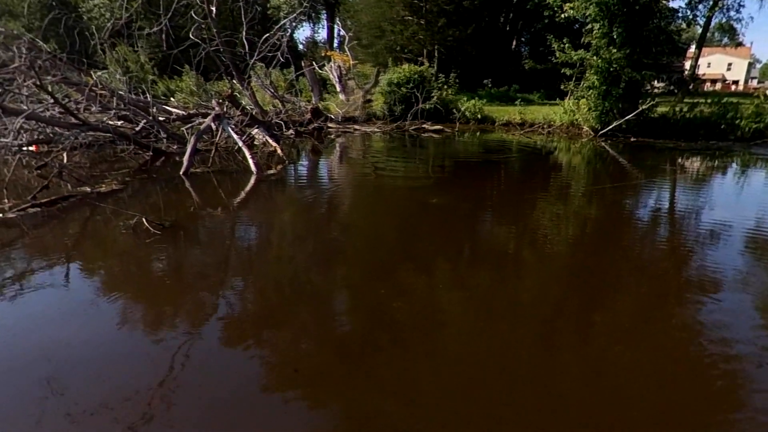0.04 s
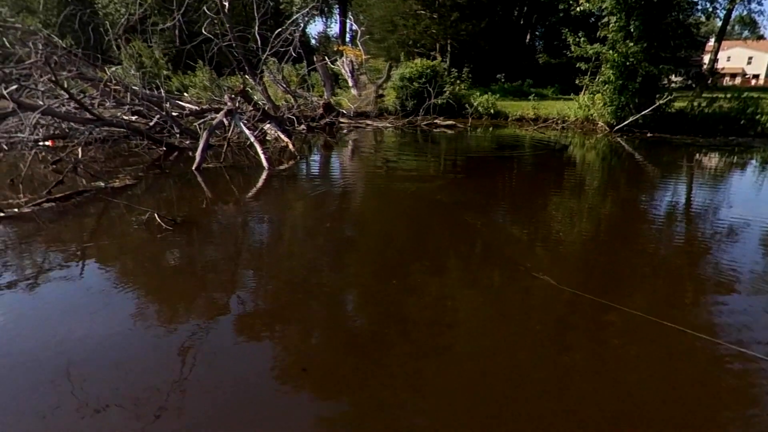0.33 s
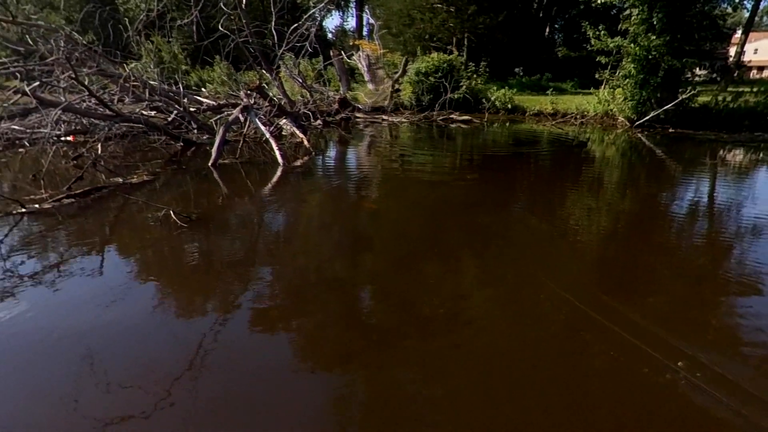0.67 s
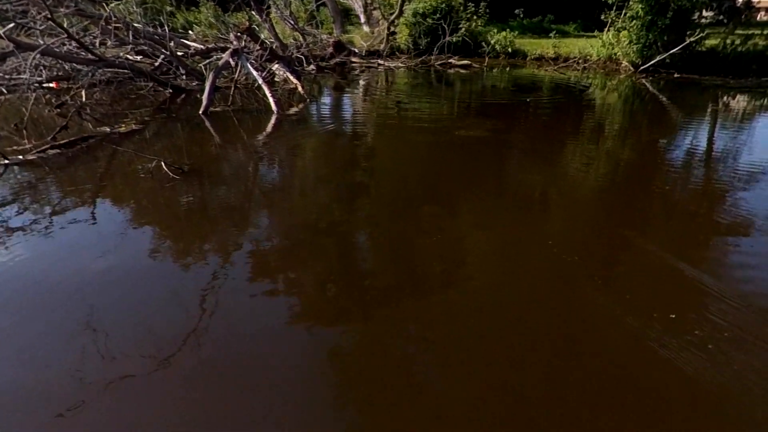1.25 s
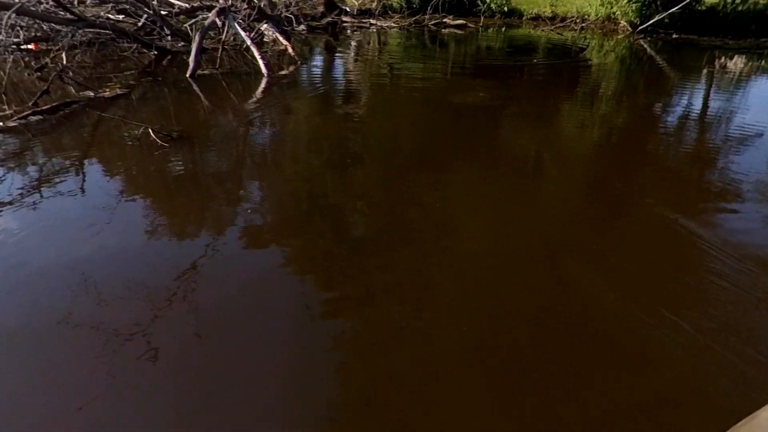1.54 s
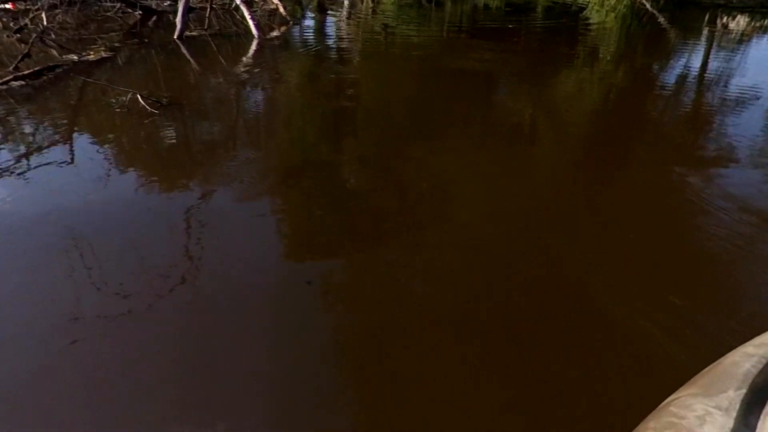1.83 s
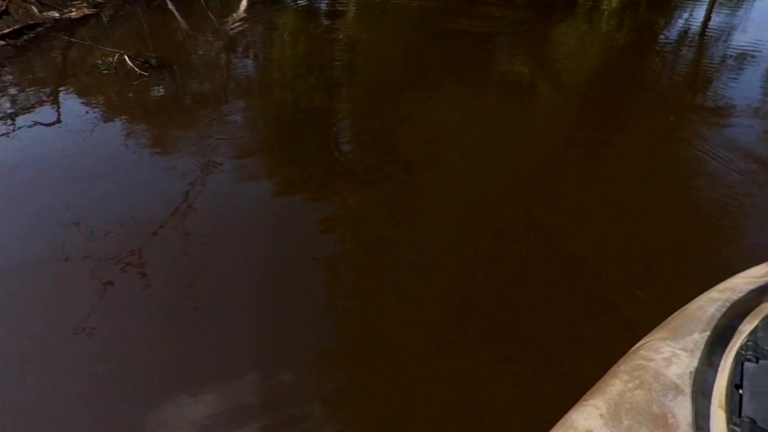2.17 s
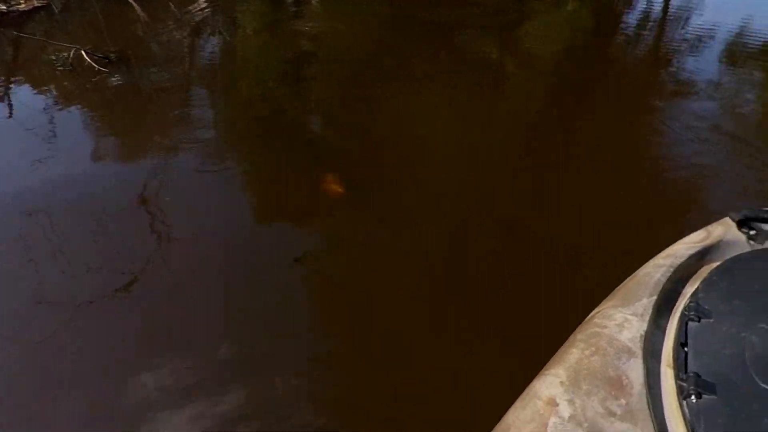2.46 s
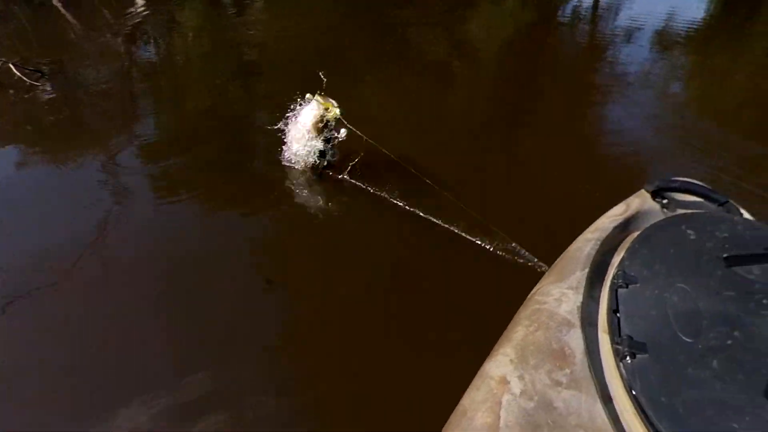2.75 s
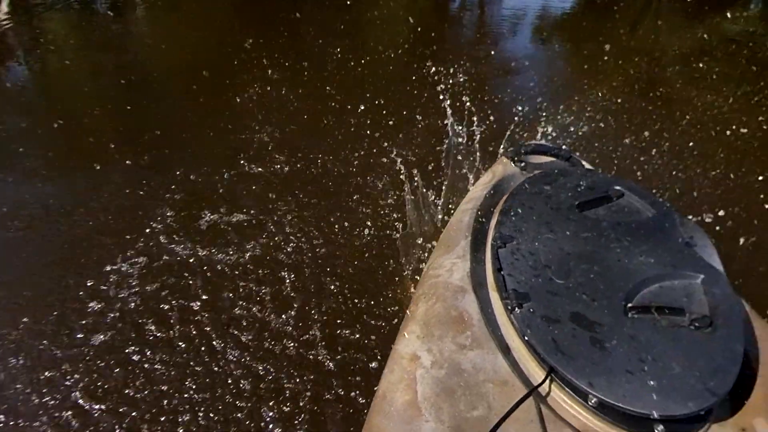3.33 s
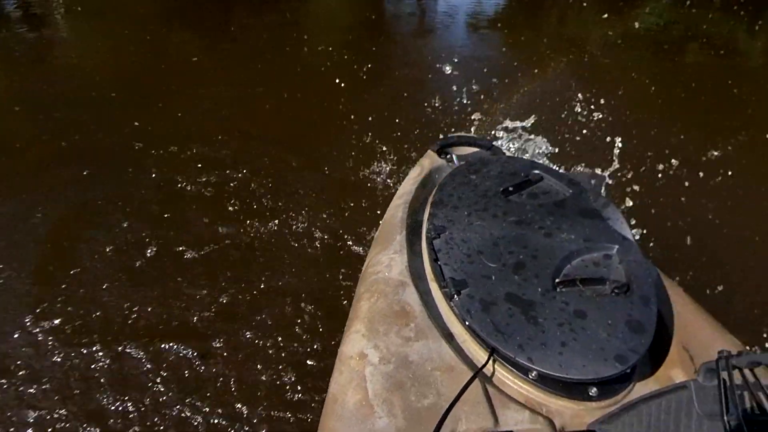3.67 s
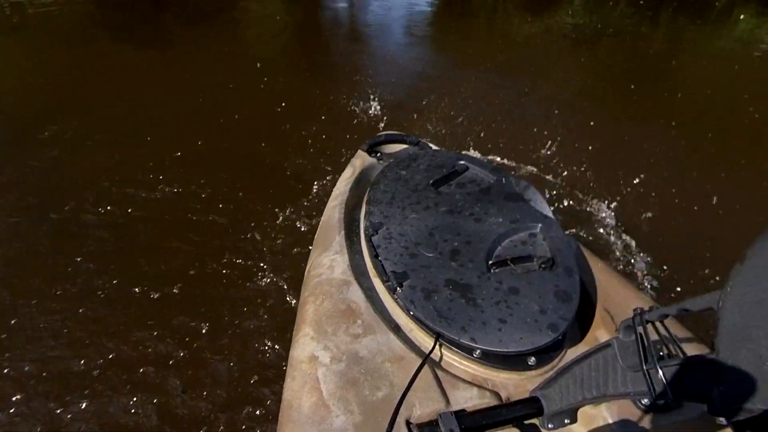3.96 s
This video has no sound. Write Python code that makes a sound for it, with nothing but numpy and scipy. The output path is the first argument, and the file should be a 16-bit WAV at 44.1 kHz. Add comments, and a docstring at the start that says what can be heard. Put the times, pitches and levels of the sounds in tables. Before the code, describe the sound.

A fish thrashes beside a kayak, with one sharp crack of fishing tackle, over steady hiss.

```python
"""A steady hiss on the right microphone and soft laps on a quiet lake; then a hooked fish thrashes
beside a kayak. Taut line rasps and whistles through the rod guides, the tackle ticks, then lets go
with a sharp double crack that rings the plastic hull and sinks into a thud. The splashes are drop
impacts and ringing bubbles; fine spray patters back on the water close by, to the right."""
import sys
import numpy as np
from scipy import signal
from scipy.fft import rfft, irfft
from scipy.io import wavfile
from scipy.ndimage import uniform_filter1d

SR = 44100
rng = np.random.default_rng(int(sys.argv[2]) if len(sys.argv) > 2 else 0)


def wav_out(sig):
    """Save sig, one row per channel (or a flat mono array), as 16-bit PCM at SR to the path in sys.argv[1]."""
    wavfile.write(sys.argv[1], SR, np.round(np.clip(np.atleast_2d(sig).T, -1, 1) * 32767).astype(np.int16))


N = 176400
TIME = np.arange(N) / SR
TOP_HZ, LINE_PAN_DB = 15850, -9

# blows of the crack (t/s, level/dB, low-pass f/Hz, left-right/dB)
BLOWS = [(3.1303, 12.5, 3300, 1), (3.1335, 9, 1800, 2), (3.1387, 12, 1050, 1), (3.1422, 5, 2000, 1)]


def undb(db):
    return 10 ** (np.asarray(db) / 20)


def unit(x):
    return x / np.sqrt(np.mean(x ** 2))


def noise():
    return rng.standard_normal((2, N))


def pan(db):
    """Microphone gains for a left-minus-right level difference."""
    return undb(np.array([[db], [-db]]) / 2)


def colour(x, points):
    """Causal filter through (f/Hz, level/dB) points that keeps the power of white noise."""
    hz, db = np.array(points, float).T
    bin_hz = np.arange(N // 2 + 1) * SR / N
    gain = unit(undb(np.interp(np.log(bin_hz + 1), np.log(hz), db)))
    cepstrum = irfft(np.log(gain), N)
    cepstrum[1:N // 2] *= 2
    cepstrum[N // 2 + 1:] = 0
    return irfft(rfft(x) * np.exp(rfft(cepstrum)), N)


def band(x, hz, width):
    """One resonance, gain 1 at its centre."""
    return signal.lfilter(*signal.iirpeak(hz, hz / width, fs=SR), x)


def butter(x, order, hz, kind):
    return signal.sosfilt(signal.butter(order, hz, kind, fs=SR, output="sos"), x)


def fade(start, t60, rise=1 / SR):
    """Envelope with a straight rise and an exponential fall; times in seconds."""
    age = np.maximum(TIME - start, 0)
    return np.minimum(age / rise, 1) * np.exp(-np.log(1000) * np.maximum(age - rise, 0) / t60) + 1e-18


def walk(per_s):
    """Smooth random wander with a spread of 1."""
    return unit(uniform_filter1d(rng.standard_normal(N), int(SR / per_s)))


def crack():
    """A few blows within 12 ms, each a contact pulse and a short rattle, ring the rod and hull."""
    # resonances of rod and hull (f/Hz, width/Hz, level/dB)
    modes = [(380, 44, -3.5), (626, 44, -10), (808, 61, 1), (1030, 47, -4), (1235, 74, -4),
             (1470, 220, 2.5), (1710, 120, 7), (2590, 220, 4), (2850, 150, 3.5), (3080, 100, 0.5),
             (4360, 280, 2)]
    rattle_db, contact_db, left_lag_s = -7.5, -2.5, 0.00027
    force = 0
    for start, db, bright_hz, side_db in BLOWS:
        push = rng.standard_normal(N) * fade(start, t60=0.022)
        push *= undb(rattle_db) / np.sqrt(np.sum(push ** 2))
        push[int(start * SR)] += undb(contact_db)
        force = force + undb(db) * pan(side_db) * butter(push, 4, bright_hz, "low")
    ring = sum(undb(db) * band(force, hz, width) for hz, width, db in modes)
    snap = undb(-32) * band(force, hz=2000, width=3600)
    left, right = butter(ring + snap, 1, 288, "high")  # the hull radiates little bass
    return np.array([np.roll(left, int(left_lag_s * SR)), right])


def thud():
    """The crack sinks into a thud: bending waves arrive high notes first, so the pitch falls."""
    start, start_hz, sag_s = 3.131, 1250, 0.0165
    hz = start_hz / (1 + np.maximum(TIME - start, 0) / sag_s)
    wave = np.sin(2 * np.pi * start_hz * sag_s * np.log(start_hz / hz))
    return undb(-30.5) * fade(start, t60=0.125, rise=0.007) * wave * pan(1)


def crack_tail():
    """The crack dies away over the hull and water as a diffuse ring."""
    # octave bands of the decay (f/Hz, level/dB, t60/s)
    octaves = [(237, -52.5, 0.55), (464, -49.5, 0.64), (890, -35.5, 0.23), (1740, -38, 0.13),
               (3260, -39.5, 0.23), (6440, -62, 0.37), (12000, -50, 0.4)]
    ring = 0
    for hz, db, t60 in octaves:
        edges_hz = [hz / np.sqrt(2), min(hz * np.sqrt(2), TOP_HZ)]
        wash = unit(butter(noise(), 3, edges_hz, "band"))
        ring = ring + undb(db) * fade(BLOWS[0][0], t60, rise=0.0052) * wash
    return ring


def line():
    """To the right, line running through the guides rasps and sets off an unsteady, very high whistle."""
    # run of the line (t/s, rasp level/dB, whistle f/Hz, whistle level/dB)
    run = [(2.845, -52, 9780, -75), (2.870, -38.5, 9950, -57), (2.883, -40, 9960, -35),
           (2.891, -41, 9980, -44), (2.905, -44.5, 10100, -42), (2.925, -45, 10200, -51),
           (2.955, -50, 9950, -50), (2.98, -47, 10250, -46), (3.005, -51, 10100, -66),
           (3.11, -49, 10200, -75), (3.18, -58, 10050, -80)]
    # spectrum of the rubbing (f/Hz, level/dB)
    rasp_spectrum = [(300, -30), (1500, -11), (4000, 3.5), (6500, 10.5), (11000, 7), (13500, 12),
                     (15500, 9.5)]
    # whistle partials (ratio to the main one, level/dB)
    partials = [(.702, -10), (1, 0), (1.318, -7)]
    times, *columns = np.array(run).T
    rasp_db, pitch_hz, whistle_db = (np.interp(TIME, times, column) for column in columns)
    running = (TIME > times[0]) & (TIME < times[-1])
    rasp = colour(noise(), rasp_spectrum) * undb(rasp_db + 2 * walk(290))
    jitter, flutter_db = 0.0135, 5
    tone = 0
    for ratio, db in partials:
        hz = ratio * pitch_hz * (1 + jitter * walk(1300))
        tone = tone + undb(db) * np.sin(2 * np.pi * np.cumsum(hz) / SR)
    tone = unit(tone * undb(flutter_db * walk(250)))
    rough_hiss = undb(-18) * unit(band(noise(), hz=10200, width=1100))
    whistle = (tone + rough_hiss) * undb(whistle_db)
    return (rasp + whistle) * running * pan(LINE_PAN_DB)


def sizzle():
    """A thin, very high sizzle as the line goes slack, just before the crack."""
    # swell of the sizzle (t/s, level/dB)
    contour = [(3.03, -65), (3.058, -48), (3.066, -33), (3.085, -51), (3.135, -55)]
    times, db = np.array(contour).T
    swell = np.interp(TIME, times, undb(db), left=0, right=0)
    return swell * unit(band(noise(), hz=14900, width=720)) * pan(LINE_PAN_DB)


def tackle():
    """Small hard parts click, mostly to the right, some with a thin metallic ring."""
    # tackle ticks (t/s, level/dB, t60/s, left-right/dB, relative ring level/dB)
    ticks = [(2.921, -35, 0.015, -14, -10), (2.929, -38, 0.025, -10, 0), (3.057, -36, 0.028, -1, -10),
             (3.0618, -25, 0.014, -12, 7), (3.1286, -29, 0.012, -12, -20), (3.1303, -22, 0.009, -4, -20),
             (3.1384, -22, 0.005, -10, -20), (3.1417, -15, 0.0055, -10, 0), (3.1432, -25, 0.018, -2, -20),
             (3.484, -39, 0.012, -2, -20)]
    # spectrum of a tick (f/Hz, level/dB)
    spectrum = [(300, -20), (2000, -9), (3500, -14.5), (5500, -4.5), (8500, -9.5), (11000, -9), (13500, -3),
                (15500, -6.5)]
    clicks = ringing = 0
    for start, db, t60, side_db, ring_db in ticks:
        click = noise() * undb(db) * fade(start, t60) * pan(side_db)
        clicks = clicks + click
        ringing = ringing + undb(ring_db) * click
    return colour(clicks, spectrum) + band(ringing, hz=14600, width=200)


def bubbles():
    """Small bubbles ring in the water, each rising in pitch as it fades."""
    per_s, low_hz, high_hz, decay_cycles, glide = 300, 650, 4510, 6, 0.04
    fizz = np.zeros((2, N))
    for when, pitch, size, side in rng.random((int(per_s * N / SR), 4)):
        hz = low_hz * (high_hz / low_hz) ** pitch
        onset = int(when * N)
        age = np.arange(min(N - onset, SR // 10)) / SR * hz / decay_cycles  # in decay times
        wave = np.sin(2 * np.pi * decay_cycles * age * (1 + glide * age / 2))
        fizz[:, onset:onset + len(age)] += pan(8 * (side - .5)) * size ** 2 * np.exp(-age) * wave
    return unit(fizz)


def splashes():
    """The fish thrashes beside the kayak: each splash is a shower of drop impacts and bubbles."""
    # splashes (t/s, level/dB, rise/s, t60/s, high-pass f/Hz)
    bursts = [(2.755, -55, 0.044, 0.54, 400), (2.849, -42.5, 0.016, 0.17, 1100),
              (2.92, -53, 0.036, 0.45, 600), (3.056, -47, 0.0072, 0.3, 1100), (3.19, -42, 0.022, 0.25, 200),
              (3.26, -53, 0.035, 1.1, 450), (3.37, -51, 0.013, 0.11, 800), (3.4, -52, 0.017, 0.2, 760),
              (3.48, -55, .008, 0.53, 600), (3.54, -66, 0.025, 3, 400), (3.83, -58, .035, 0.42, 304)]
    # spectrum of the drop impacts (f/Hz, level/dB)
    spectrum = [(100, -46), (200, -19), (330, -3), (600, 1), (1200, 0.5), (2500, -6), (5000, -8.5),
                (9000, -11.5), (15000, -13)]
    drops_per_s = 6000
    drops = (rng.random((2, N)) < drops_per_s / SR) * np.sign(noise())
    shower = (unit(colour(drops, spectrum)) + undb(-7) * bubbles()) * pan(-2.5)
    return sum(undb(db) * fade(start, t60, rise) * butter(shower, 2, low_hz, "high")
               for start, db, rise, t60, low_hz in bursts)


def plips():
    """Single large drops land on the lake with a short, hollow plip."""
    # large drops (t/s, level/dB, f/Hz)
    drops = [(2.859, -51, 2120), (3.063, -54, 2000), (3.378, -45, 2200), (3.739, -56, 2100)]
    sound = 0
    for start, db, hz in drops:
        hollow = unit(band(band(noise(), hz, width=2900), hz, width=2900))
        sound = sound + undb(db) * fade(start, t60=0.044, rise=0.0015) * hollow
    return sound


def spray():
    """Fine spray lands close by on the right in short, bright patters."""
    # falls of spray (t/s, level/dB, t60/s)
    falls = [(3.165, -50, 0.29), (3.225, -48, 0.05), (3.405, -46, 0.073), (3.48, -48.5, 0.076),
             (3.56, -55, 0.19)]
    flow = sum(undb(db) * fade(start, t60, rise=0.0073) for start, db, t60 in falls)
    patter = band(noise(), hz=6960, width=10000) * undb(3.6 * walk(600))
    return flow * unit(patter) * pan(-14)


def laps():
    """The lake laps softly at the hull."""
    # laps (t/s, level/dB)
    wavelets = [(.51, -71), (.715, -60), (.968, -63), (1.205, -65)]
    swell = sum(undb(db) * fade(start, t60=0.11, rise=0.0063) for start, db in wavelets)
    return swell * unit(band(noise(), hz=600, width=810))


def microphone_hiss():
    """The right microphone hisses steadily."""
    # spectrum of the hiss (f/Hz, density/dB)
    spectrum = [(40, -35), (100, -31.5), (150, -24.5), (200, -12.5), (300, -7), (520, -2), (750, 0),
                (1800, -0.5), (2600, -1.6), (3600, -3), (6000, -5.5), (10000, -6.5), (15500, -8.5)]
    return undb(-40) * colour(noise(), spectrum) * np.array([[0], [1]])


def lake_air():
    """Faint, still air over the lake reaches both microphones."""
    # spectrum of the open air (f/Hz, density/dB)
    spectrum = [(40, -18), (130, 3), (400, 3), (1000, 2), (2200, -2.5), (3500, 6), (6800, 8), (9000, -8),
                (15000, -5.5)]
    return undb(-66) * colour(noise(), spectrum)


def scene():
    background = microphone_hiss() + lake_air() + laps()
    rod_and_hull = line() + sizzle() + tackle() + crack() + thud() + crack_tail()
    return background + rod_and_hull + splashes() + plips() + spray()


def record(dry):
    """The recorder cuts the deep bass and the very top."""
    thin = butter(dry, 2, 60, "high")
    return signal.sosfilt(signal.ellip(12, .1, 80, TOP_HZ, fs=SR, output="sos"), thin)


dry = scene()
out = record(dry)
wav_out(out)
```